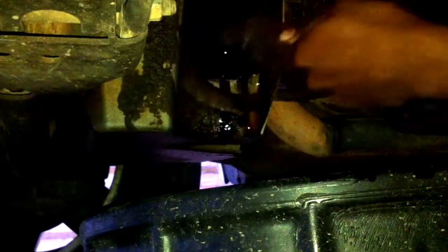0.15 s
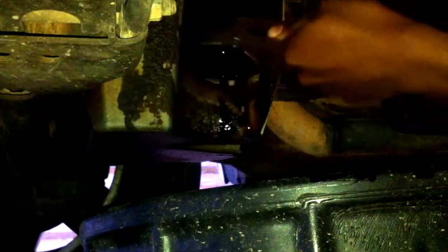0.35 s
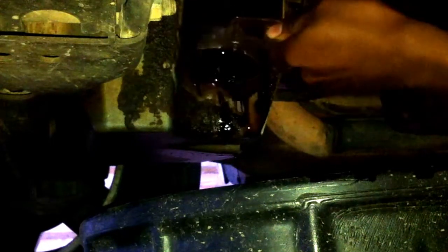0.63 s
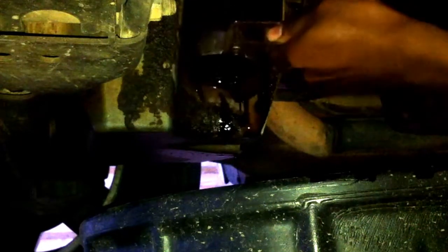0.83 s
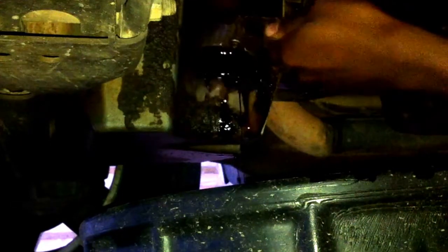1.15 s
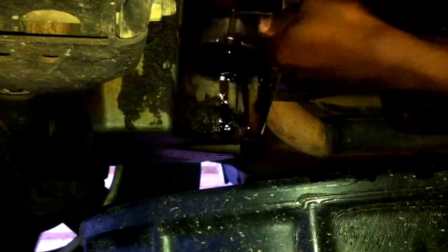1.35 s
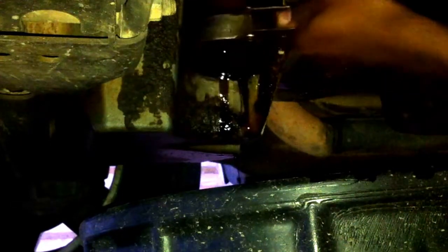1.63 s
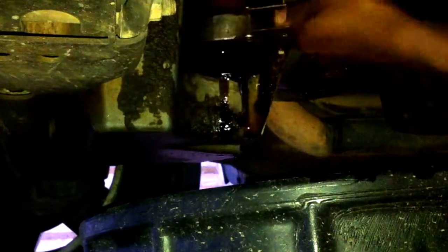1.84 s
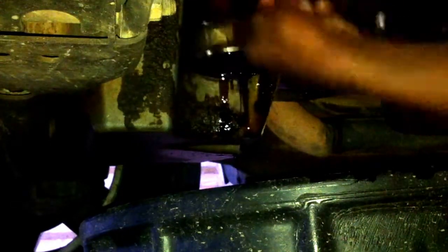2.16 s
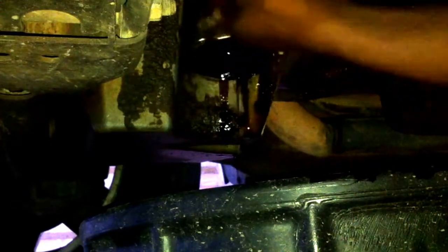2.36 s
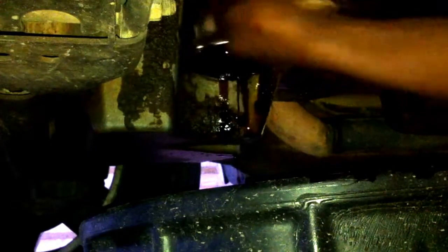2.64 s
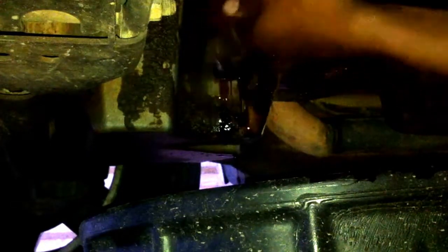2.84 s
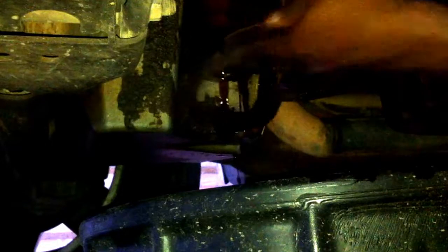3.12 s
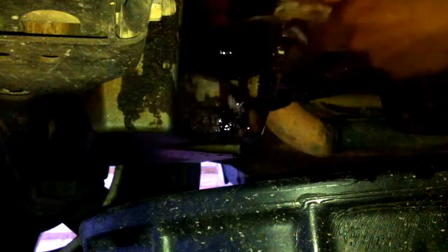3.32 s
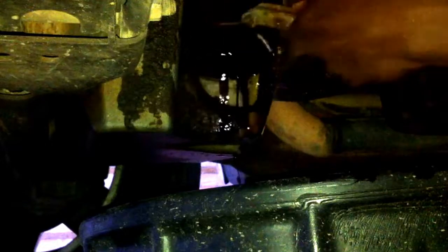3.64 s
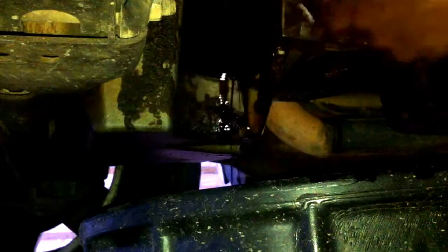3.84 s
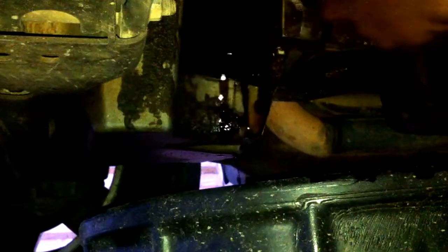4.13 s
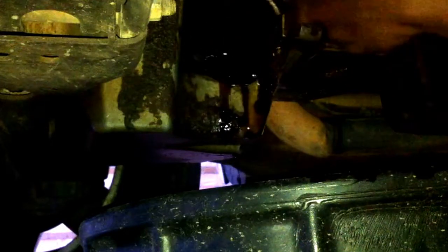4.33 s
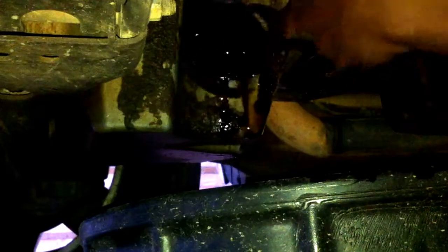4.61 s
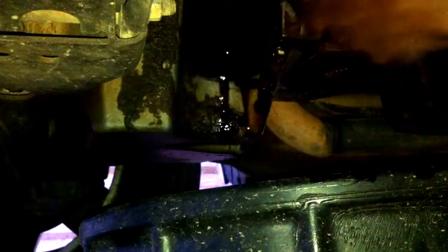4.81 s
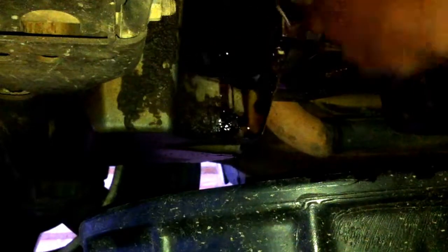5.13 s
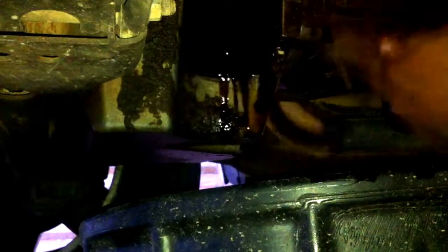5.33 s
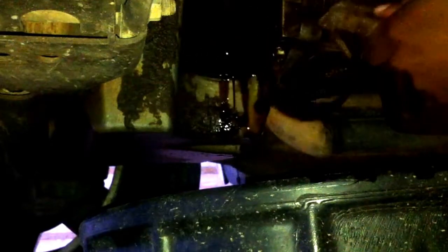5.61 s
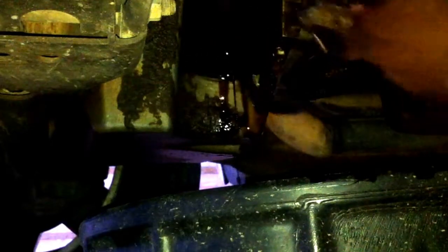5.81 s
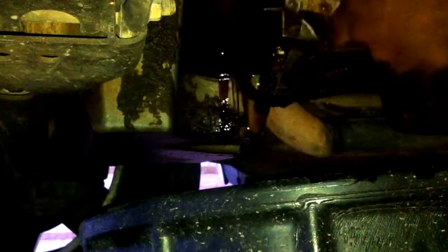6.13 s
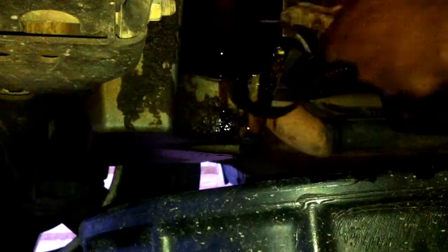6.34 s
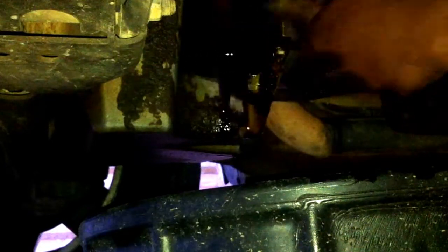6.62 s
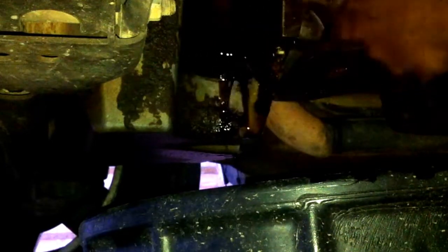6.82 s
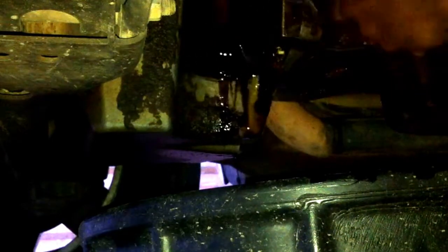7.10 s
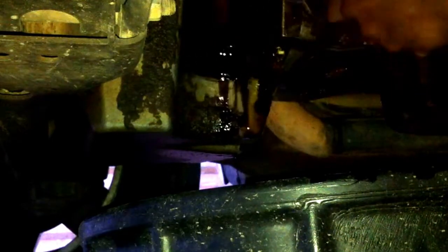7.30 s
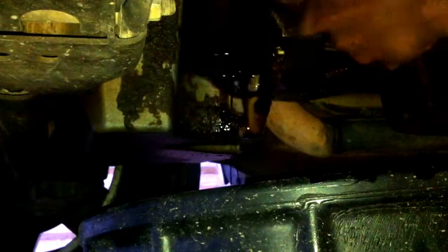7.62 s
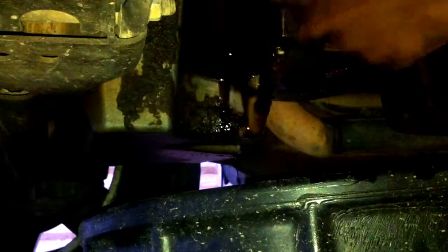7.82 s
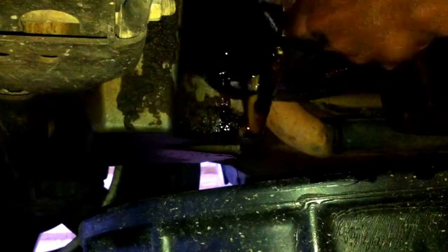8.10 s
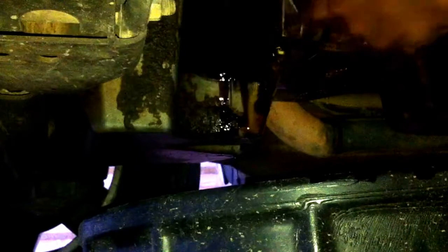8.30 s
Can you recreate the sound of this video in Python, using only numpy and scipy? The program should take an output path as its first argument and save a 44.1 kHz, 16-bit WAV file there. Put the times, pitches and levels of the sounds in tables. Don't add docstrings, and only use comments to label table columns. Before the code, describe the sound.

Thick oil drips and trickles into a plastic drain pan under a vehicle while a wrench taps hollow metal and cloth drags, bumping a panel midway.

```python
import sys
import numpy as np
from scipy import signal
from scipy.fft import rfft, irfft, next_fast_len
from scipy.io import wavfile
from scipy.ndimage import map_coordinates

SR = 44100
rng = np.random.default_rng(int(sys.argv[2]) if len(sys.argv) > 2 else 0)


def attenuation_scalar(level_db):
    decades = np.asarray(level_db, float) / 20
    return 10 ** decades


def generate_wav(signal):
    frames = np.transpose(np.atleast_2d(signal))
    scaled = np.clip(frames, -1, 1) * 32767
    pcm = np.round(scaled).astype(np.int16)
    wavfile.write(sys.argv[1], SR, pcm)


N = 373086

# t/s, peak level/dB, pan pitch f/Hz, length/s
EARLY_DRIPS = [(0.054, -45.5, 180, 0.022), (0.176, -48.8, 166, 0.026), (0.224, -48.2, 175, 0.018),
               (0.424, -51.6, 180, 0.032), (0.535, -51, 172, 0.025), (0.594, -45.9, 170, 0.042),
               (0.732, -49.4, 173, 0.037), (0.778, -41.0, 170.7, 0.035), (0.887, -48, 174, 0.026),
               (0.885, -51, 164.4, 0.064), (0.957, -51, 175, 0.023), (1.079, -46.5, 176, 0.018),
               (1.105, -49, 164, 0.016), (1.166, -52.5, 183, 0.027), (1.223, -52.7, 179, 0.024),
               (1.269, -51, 184, 0.03), (1.371, -48, 172.5, 0.031), (1.452, -49, 178, 0.015),
               (1.673, -40, 172, 0.017), (1.707, -47.5, 181, 0.019), (1.79, -45.6, 176, 0.025),
               (1.917, -52.5, 184, 0.04), (2.039, -47.5, 187, 0.039), (2.15, -43.5, 169, 0.017),
               (2.218, -45, 176.6, 0.023), (2.216, -53, 179.7, 0.048), (2.285, -44.5, 178, 0.024),
               (2.452, -42.5, 172, 0.036), (2.626, -47.5, 174, 0.017), (2.673, -49.8, 174, 0.014)]
MIDDLE_DRIPS = [(2.804, -50.9, 169, 0.022), (2.886, -50.5, 182, 0.043), (3.056, -45.5, 172, 0.018),
                (3.09, -51.5, 181, 0.036), (3.137, -49.5, 176.4, 0.07), (3.24, -45, 180, 0.036),
                (3.522, -50.5, 174, 0.033), (3.747, -41, 176, 0.021), (3.781, -51.5, 174, 0.02),
                (3.838, -49.5, 177, 0.032), (3.916, -58, 170, 0.02), (3.96, -54, 172, 0.021),
                (4.049, -46, 174, 0.03), (4.127, -55, 167, 0.057), (4.203, -50, 172, 0.014),
                (4.228, -48, 168.3, 0.035), (4.274, -53, 177, 0.045), (4.429, -51.5, 169, 0.087),
                (4.463, -50.5, 167, 0.017), (4.576, -44.5, 173.7, 0.034), (4.751, -50, 172, 0.017),
                (4.775, -51, 178, 0.017), (4.919, -50, 175, 0.026), (5.139, -48, 176, 0.032),
                (5.321, -47, 170, 0.011), (5.353, -52.5, 201, 0.0074)]
LATE_DRIPS = [(5.552, -43.5, 170, 0.022), (5.633, -49, 170, 0.024), (5.756, -50.1, 179, 0.02),
              (5.957, -55, 195, 0.047), (6.021, -45, 180, 0.014), (6.049, -51, 195, 0.017),
              (6.152, -45.5, 172, 0.029), (6.23, -44, 188, 0.02), (6.314, -50.5, 175, 0.034),
              (6.488, -52.4, 169, 0.03), (6.631, -50.9, 172, 0.029), (6.68, -46.5, 173.3, 0.035),
              (6.722, -45.5, 170, 0.023), (6.756, -45, 171, 0.032), (6.831, -52.2, 173, 0.028),
              (6.885, -48.5, 172, 0.023), (7.177, -52, 165.5, 0.034), (7.3, -48, 178, 0.019),
              (7.336, -50.5, 183, 0.017), (7.366, -47.1, 164.3, 0.036), (7.439, -51, 172, 0.025),
              (7.492, -42, 176, 0.014), (8.062, -50.5, 170, 0.026), (8.124, -47.5, 178.4, 0.031),
              (8.233, -47, 172, 0.018)]
FAINT_DRIPS = [
    (5.856, -59, 162, .025),
    (7.016, -60, 140, 0.022),
    (7.111, -59, 183, 0.027),
    (7.702, -55, 180, 0.053),
    (7.861, -60, 164, 0.022),
    (7.912, -56, 175, 0.02),
]
# t/s, flow level/dB
STREAM = [(0, -56.5), (0.8, -62.5), (3.1, -65), (5, -64), (5.25, -64), (5.49, -49.5), (5.77, -61),
          (6.08, -57), (6.95, -67), (7.45, -64.5), (7.84, -81), (8.46, -62.5)]
# f/Hz, width/Hz, level/dB
PAN_FLOOR = [(172, 42, 1.5), (313, 35, -9)]
PAN_WALLS = [(331.5, 55, 0.5), (521, 53, 5.5), (647, 89, -1), (723, 49, 2.5), (872, 39, 2.5),
             (1250, 230, -10), (1630, 530, -24.5)]
PATTER_DB, PATTER_FOLLOWS = -71, 0.47

# f/Hz, level/dB (per Hz)
GARAGE_HISS = [(12, -39), (20, -23), (49, -22), (59, -33.5), (119, -2.5), (171, 0.5), (239, -9), (384, -11),
               (887, -13), (1020, -16), (1550, -21.5), (6790, -26), (9490, -24.5), (14000, -29.5),
               (15900, -29)]
HISS_DB = -66.5
# f/Hz, level/dB
WHINE = [(14998, -80)]

# t/s, peak level/dB, blow f/Hz, softness/dB
TAPS = [(0.081, -35, 1200, -14), (1.034, -59, 1930, -5), (1.1827, -55, 1250, -10),
        (3.5043, -36.5, 1300, -12), (3.5468, -44, 870, -4), (4.0181, -31.5, 1250, -8.5),
        (4.2219, -52, 700, 1.5), (4.9955, -54, 1280, 7), (5.3524, -41.5, 900, 8), (5.463, -52, 1100, 7),
        (5.8, -49, 1130, -2), (5.924, -50, 1560, -18), (6.0212, -39, 1800, -10), (6.1835, -52, 1500, -19),
        (6.2088, -45.5, 1580, -11), (6.4627, -52.5, 1370, -7), (6.4946, -48.5, 1250, 7.5),
        (6.7, -56.5, 1510, -13), (6.65, -57.5, 1300, -7), (6.7574, -57, 620, 1), (6.9125, -40, 1900, -1.5),
        (6.9205, -44.5, 790, 0), (6.9265, -42, 1400, -9), (6.1595, -53, 1490, -18), (6.173, -57, 1400, -18),
        (7.509, -47, 1500, 3), (7.1666, -62, 1210, 12), (7.4475, -56.5, 600, -1), (7.24, -60, 650, 0),
        (7.3, -62, 890, 2), (3.795, -58.5, 1300, -6), (7.519, -46.5, 880, 2.5), (7.647, -45, 870, 4.5),
        (7.657, -52, 890, -4), (7.988, -55.5, 1000, 1), (8.1444, -49, 850, 0), (8.438, -50.5, 500, 0),
        (8.4295, -51, 990, -3)]
# f/Hz, width/Hz, level/dB
CHASSIS = [(486, 113, -3), (732, 58, -0.5), (890, 57, 1), (980, 220, 0), (1250, 250, 5.5), (1624, 270, 1),
           (2050, 240, -3.5), (2680, 590, 6), (3900, 680, 6.5), (4630, 1200, 2.5)]
# f/Hz, level/dB, time to fall 60 dB/s
HOLLOW_FRAME = [(500, -2, 0.13), (724, 0.5, 0.74), (700, -5, 0.39), (878, -1.5, .33), (907, -9, 0.64),
                (1055, -7, .35), (1300, -3, 0.28), (1427, -10.5, 0.45), (1560, -8, 0.23), (1680, -15, .18)]
TREBLE_DB, TREBLE_LOSS = -19, 0.59
BLOW_LOSS, RING_GAIN, ECHO_GAIN = 0.33, 0.24, 0.17
ECHO_T60_S = 0.14
HAND_DAMPS = 12

# peak t/s, rise/s, fall/s, level/dB, brightness/dB
GLOVE_RUBS = [(1.04, .03, .02, -60, -6), (1.182, .015, .12, -73, 1.5), (1.365, .015, 0.19, -68.5, 1.5),
              (1.434, 0.01, 0.083, -62, -2), (2.056, 0.036, .02, -61, -7), (2.16, 0.13, .09, -64.5, -1),
              (2.326, 0.062, .06, -71, 1.5), (2.418, .02, 0.071, -64.5, -1), (2.61, 0.14, 0.13, -70, -2),
              (2.91, 0.087, .09, -65.5, 3.5), (3.138, .02, .07, -82, 0), (1.25, .025, 0.065, -70, -1),
              (2.21, .04, 0.033, -70.5, 4), (2.45, 0.025, 0.036, -69, 1), (7.11, 0.054, .08, -73.5, 4.5)]
SLEEVE_STROKES = [(4.994, 0.031, .06, -62.5, -23), (5.075, .012, .08, -58, -19),
                  (5.14, 0.09, 0.13, -46, -19.5), (5.19, 0.071, 0.15, -48.5, -17),
                  (5.29, 0.18, 0.17, -51, -16.5), (5.335, 0.023, 0.068, -62, -3.5),
                  (5.36, .012, 0.11, -48.5, -13), (5.385, 0.045, .08, -54, -7),
                  (5.416, 0.014, 0.13, -45, -16), (5.63, 0.28, 0.15, -56.5, -10),
                  (5.77, 0.24, 0.2, -59, -11), (5.88, 0.11, .08, -63, -6.5),
                  (5.925, .006, 0.091, -53, -12.5), (5.99, 0.085, .08, -45, -12),
                  (6.022, .035, 0.055, -44.5, -7), (6.057, 0.019, 0.045, -43, -3.5),
                  (6.09, .05, 0.14, -54, -11), (6.41, .1, 0.11, -66.5, -7),
                  (6.214, 0.068, 0.13, -55.5, -9.5), (6.345, 0.064, 0.053, -57.5, -6.5),
                  (6.5, .2, 0.3, -69, -23)]
SWING_DB, ROUND = 25.5, 1.71
SCUFF_DB, FIZZ_DB, FIZZ_GROWS = (-5.5, 0.5), (-3, -1.7), 1.05
# f/Hz, level/dB (per Hz)
DRAG = [(150, -46), (250, -18), (413, -8), (500, -16), (568, -6), (1050, -6), (2070, -12.5), (3200, -36),
        (4160, -52), (7040, -120)]
# f/Hz, width/Hz, level/dB
FOLDS = [(432, 42, -7), (726, 11, -9), (910, 44, -2.5), (1280, 48, -0.5), (2060, 570, -13.5),
         (3140, 28, -30)]
# f/Hz, width/Hz, level/dB
SCUFF = [(2050, 310, -2.5), (2740, 650, 0.5), (3790, 370, 1.5), (4310, 490, -1.5), (5420, 910, -6)]
# f/Hz, width/Hz, level/dB
FIZZ = [(6540, 1600, -16.5), (7800, 900, -7), (8500, 210, -4), (9090, 330, -0.5), (9770, 430, 0),
        (10390, 340, -2.5), (11160, 960, -4), (13400, 2900, -12)]
# t/s, f/Hz, level/dB
SQUEAK = [
    (5.62, 3420, -82),
    (5.69, 3550, -68),
    (5.74, 3540, -69.5),
    (5.82, 3440, -70),
    (5.85, 3380, -82),
]

# t/s, peak level/dB, middle range level/dB, time to fall 60 dB/s
CRINKLES = [(1.183, -54, -11, 0.038), (1.2363, -61, -2, 0.1), (1.3635, -61.5, 3, .06),
            (1.4338, -42.5, -9.5, 0.053), (1.605, -43, -9, 0.095), (2.041, -54, -8, .04),
            (2.046, -48, -8, 0.025), (2.05, -53, -7, 0.022), (1.443, -54, -4, .06),
            (2.932, -52, -13, 0.048), (2.951, -50, -14, 0.025), (2.955, -57, -12, 0.027),
            (2.0941, -53, -9, 0.057), (2.285, -56, -5, 0.05), (2.3083, -55, -6, 0.07),
            (2.411, -60, -3, 0.05), (2.5765, -61, -3, 0.054), (2.6339, -60, -18, 0.05),
            (2.935, -46.5, -4, 0.055), (3.1412, -61.5, -1, 0.05), (3.7894, -60, 0, 0.05),
            (4.6994, -62, 0.5, 0.054), (5.3223, -53, -17, 0.05), (5.4132, -51, -9, 0.05),
            (5.462, -50, -1.5, 0.05), (5.6191, -49, -16, 0.05), (5.865, -47.5, -12, 0.004),
            (6.0122, -46, -13, 0.066), (6.0504, -34, -25, 0.029), (6.058, -39.5, -8, 0.055),
            (5.355, -49, -14, 0.077), (5.879, -56, -16, .02), (5.985, -48, -12, .05),
            (6.2233, -60, -18, 0.055), (6.3235, -55, -17, 0.05), (6.348, -55, -16, 0.073),
            (6.908, -56, -25, 0.06), (8.431, -57, 3.5, 0.092)]
# f/Hz, width/Hz, level/dB
SNAP = [(2300, 880, -6), (3700, 400, 3), (4530, 470, -0.5), (5340, 660, 0), (12500, 2600, -8)]

# t/s, level/dB, f/Hz, time to fall 60 dB/s
PLINKS = [
    (1.185, -65, 970, 0.046),
    (1.395, -68, 2050, 0.18),
    (1.478, -60, 758, 0.15),
    (2.042, -63, 1990, .04),
    (2.592, -63, 1280, 0.072),
    (5.625, -51, 770, 0.098),
    (5.925, -55, 1580, 0.25),
    (7.088, -70, 5500, .07),
]

# t/s, ring level/dB, scatter level/dB
CLANK = (1.606, -42.5, -43)
# f/Hz, level/dB, time to fall 60 dB/s
STEEL = [(808, -2, 0.37), (910, -9, .45), (1055, -5.5, 0.46), (1300, -14, .37), (1410, -14, .31),
         (1580, -13.5, .3), (1998, 0, 0.26), (2380, -6, .15), (2455, -7, 0.22), (2789, -8, .12),
         (2980, -6, .1), (3800, -16, 0.13), (4215, -6, .14), (4520, -10, 0.27), (5136, -9, .1),
         (5500, -9, .09), (6300, -14, 0.074)]

# t/s, peak level/dB, f/Hz
CATCHES = [(5.067, -51, 830), (5.073, -44.5, 860), (5.228, -49, 1010), (5.24, -48, 1500),
           (5.298, -45, 1300), (5.315, -50, 1100), (5.33, -46, 1400), (5.378, -36, 1300),
           (5.393, -41, 1500), (5.402, -46, 900), (5.088, -41, 1110), (5.103, -39, 920), (5.12, -36, 745),
           (5.135, -48, 1300), (5.143, -37, 890), (5.149, -39.5, 720), (5.168, -42, 1190),
           (5.179, -36, 930), (5.192, -44, 680), (5.213, -44, 1150), (5.264, -51, 900), (5.279, -55, 750),
           (5.352, -39, 915), (5.361, -37, 620), (5.372, -38, 760), (5.385, -35.5, 516), (5.971, -40, 640),
           (5.985, -38, 1220), (5.996, -39, 950), (6.012, -46, 1100), (6.024, -41, 756), (6.031, -46, 700),
           (6.057, -45, 670), (6.062, -48, 1190), (6.071, -48, 800)]
CATCH_T60_S, CATCH_WIDTH = 0.04, 0.32

# t/s, level/dB, hardness/dB
BUMPS = [
    (5.4135, -29.5, 13),
    (5.417, -18.5, 12.5),
    (5.4288, -21.5, -5.5),
    (5.4418, -32.5, -23),
    (5.4463, -30.5, -5),
    (5.4626, -35.5, 24),
    (5.4743, -34.5, 13),
]
# f/Hz, level/dB, time to fall 60 dB/s
PANEL = [(131, -3, 0.088), (207, -5, 0.038), (240, -14.5, 0.22), (269, 12, 0.0313), (298, 1.5, 0.016),
         (379, 0, 0.07), (504, -5.5, 0.03), (777, -11.5, 0.019)]
# t/s, width/s, level/dB, top f/Hz
JOLTS = [
    (5.45, .04, -49, 40),
    (6.025, 0.057, -51, 380),
]


def unit(x):
    return x / np.sqrt(np.mean(x ** 2) + 1e-20)


def seconds(length):
    return np.arange(int(length * SR)) / SR


def onset(t, rise):
    return 1 - np.exp(-t / rise)


def decay(t, t60):
    return attenuation_scalar(-60 * t / t60)


def curves(rows, outside=-120):
    s, *cols = np.transpose(rows)
    return np.array([np.interp(np.arange(N) / SR, s, c, outside, outside) for c in cols])


def wobble(rate):
    knots = rng.standard_normal(int(N * rate / SR) + 4)
    return map_coordinates(knots, [np.arange(N) * rate / SR])


def filtered(x, response):
    m = next_fast_len(len(x) + 8192)
    return irfft(rfft(x, m) * response(np.fft.rfftfreq(m, 1 / SR)), m)[:len(x)]


def colour(points):
    f, v = np.transpose(points)
    return lambda hz: attenuation_scalar(np.interp(np.log(hz + 1), np.log(f + 1), v, -120, -120))


def resonant(modes):
    def response(f):
        total = 0
        for k, (c, w, db) in enumerate(modes):
            total = total + (-1) ** k * attenuation_scalar(db) * 1j * f * w / (c * c - f * f + 1j * f * w)
        return total
    return response


def ringing(modes, t, scatter_db):
    total = 0
    for hz, db, t60 in modes:
        strength = attenuation_scalar(db + scatter_db * rng.standard_normal())
        total = total + strength * decay(t, t60) * np.sin(2 * np.pi * (hz * t + rng.random()))
    return total


def grainy(rate, depth_db):
    return unit(rng.standard_normal(N) * attenuation_scalar(depth_db * wobble(rate)))


def add(track, s, db, sound, noisy=False):
    if noisy:
        size = 2.5 * np.sqrt(np.mean(sound[:SR // 40] ** 2))
    else:
        size = np.max(np.abs(sound))
    part = track[round(s * SR):][:len(sound)]
    part += attenuation_scalar(db) * sound[:len(part)] / size


def oil():
    drum, splat, t = np.zeros(N), np.zeros(N), seconds(0.2)
    for s, db, hz, length in [*EARLY_DRIPS, *MIDDLE_DRIPS, *LATE_DRIPS, *FAINT_DRIPS]:
        smothered = attenuation_scalar(-6 * (t / (1.17 * length)) ** 3.9) + attenuation_scalar(-18) * decay(t, 0.3)
        swell = onset(t, 0.0021) ** 2 * smothered
        add(drum, max(s, 0), db - 5.5, swell * np.sin(2 * np.pi * hz * t))
        spray = rng.standard_normal(len(t)) * np.minimum(t / 0.0069, 1) * decay(t, 0.093)
        add(splat, s + 0.00299, db - 1.5, spray)
    flow_db, = curves(STREAM, outside=None)
    murmur = unit(filtered(grainy(rate=35, depth_db=1.0), resonant(PAN_FLOOR)))
    murmur = attenuation_scalar(flow_db - 4.5) * murmur
    patter_db = PATTER_DB + PATTER_FOLLOWS * (flow_db - flow_db.mean())
    patter = attenuation_scalar(patter_db) * unit(filtered(grainy(rate=40, depth_db=2.5), resonant(PAN_WALLS)))
    return drum + murmur + patter + 3 * filtered(splat, resonant(PAN_WALLS))


def garage():
    out = attenuation_scalar(HISS_DB + 1.5) * unit(filtered(rng.standard_normal(N), colour(GARAGE_HISS)))
    for hz, db in WHINE:
        size = np.sqrt(2) * attenuation_scalar(db - 2.5 + 1.5 * wobble(12))
        out += size * np.sin(2 * np.pi * np.cumsum(hz + 11 * wobble(30)) / SR)
    return out


def wrench():
    out, t = np.zeros(N), seconds(1 / 3)
    low, mid, high = resonant(CHASSIS[:3]), resonant(CHASSIS[3:7]), resonant(CHASSIS[7:])
    dull = lambda f: 1 / (1 - (f / 2400) ** 2 + 1j * f / 2600) ** 2
    dull_mid = lambda f: mid(f) * dull(f)
    soft_high = lambda f: high(f) / (1 - (f / 5200) ** 2 + 1j * f / 5000)
    for s, db, hz, soft_db in TAPS:
        blow = np.sin(2 * np.pi * hz * t) + 0.14 * rng.standard_normal(len(t))
        blow += attenuation_scalar(-13 - 0.5 * soft_db) * np.sin(2 * np.pi * 2030 * t)
        blow *= decay(t, 0.015) * onset(t, 0.00064)
        add(out, s - 0.0003, db - BLOW_LOSS * soft_db - 1.0, filtered(blow, dull))

        damping = attenuation_scalar(-HAND_DAMPS * max(soft_db + 11, 0) * t)
        frame = ringing(HOLLOW_FRAME, t, scatter_db=0.5) * damping * onset(t, 0.01)
        add(out, s, db + RING_GAIN * soft_db - 12.5, frame)

        high_db = TREBLE_DB - TREBLE_LOSS * soft_db
        # response, level in dB, relative life, build-up in s
        ranges = ((low, 0.73 * soft_db - 3.5, 1.1, 0.0031),
                  (dull_mid, ECHO_GAIN * soft_db - 9, 1.3, 0.003),
                  (soft_high, high_db - 5.5, 0.5, 0.0005))
        for body, rel_db, life, lag in ranges:
            echoes = rng.standard_normal(len(t)) * decay(t, life * ECHO_T60_S) * onset(t, lag)
            add(out, s - 0.0005, db + rel_db, filtered(echoes, body), noisy=True)
    return out


def pressure():
    power, t = np.zeros((3, N + SR)), np.arange(-SR // 2, SR // 2) / SR
    for rows, scuff_db, fizz_db in zip((GLOVE_RUBS, SLEEVE_STROKES), SCUFF_DB, FIZZ_DB):
        for s, rise, fall, db, bright_db in rows:
            shape_db = db - SWING_DB * np.where(t < 0, -t / rise, t / fall) ** ROUND
            range_db = np.array([[0], [scuff_db + bright_db], [fizz_db + FIZZ_GROWS * bright_db]])
            start = round(s * SR) - SR // 2
            power[:, start:start + len(t)] += attenuation_scalar(shape_db + range_db) ** 2
    return np.sqrt(power[:, :N])


def rubbing():
    drag, scuff, fizz = pressure()
    grit = attenuation_scalar(1.77 * wobble(90))

    def rough(response):
        friction = grainy(rate=300, depth_db=1.5)
        slips = (rng.random(N) < 1200 / SR) * rng.standard_normal(N) * 3
        return unit(grit * filtered(friction + slips, response))

    cloth = drag * (attenuation_scalar(-3.5) * rough(colour(DRAG)) + attenuation_scalar(-10.0) * rough(resonant(FOLDS)))
    hz, db = curves(SQUEAK)
    squeak = np.sin(2 * np.pi * np.cumsum(hz + 90 * wobble(150)) / SR)
    squeak *= attenuation_scalar(db + 3.5) * (0.3 + wobble(520))
    return cloth + scuff * rough(resonant(SCUFF)) + fizz * rough(resonant(FIZZ)) + squeak


def crinkles():
    out, t = np.zeros(N), seconds(0.1)
    for s, db, mid_db, t60 in CRINKLES:
        grit = attenuation_scalar(4.0 * rng.standard_normal(len(t) // 40 + 1)).repeat(40)[:len(t)]
        shape = np.minimum(t / 0.0026, 1) * (decay(t, t60) * grit + 0.7 * decay(t, 0.0038))
        for modes, rel_db in ((FIZZ, 0), (SNAP, mid_db + 2.5)):
            spray = filtered(shape * rng.standard_normal(len(t)), resonant(modes))
            add(out, s - 0.0005, db + rel_db, spray)
    return out


def plinks():
    out, t = np.zeros(N), seconds(1 / 6)
    for s, db, hz, t60 in PLINKS:
        bubble = np.sin(2 * np.pi * hz * (t + 0.36 * t * t))
        add(out, s, db, bubble * decay(t, t60) * onset(t, 0.0026))
    return out


def clank():
    out, t = np.zeros(N), seconds(0.5)
    s, ring_db, scatter_db = CLANK
    for lag, rel_db in ((0, -1.5), (0.009, -5.5)):
        shimmer = 1 + 0.37 * wobble(128)[:len(t)]
        ring = ringing(STEEL, t, scatter_db=0.0) * shimmer * onset(t, 0.0013)
        add(out, s + lag, ring_db + rel_db, ring)
    scatter = rng.standard_normal(len(t)) * decay(t, 0.16) * onset(t, 0.004)
    add(out, s, scatter_db, filtered(scatter, resonant(CHASSIS)))
    return out


def catches():
    out, t = np.zeros(N), seconds(0.05)
    muffled = lambda f: 1 / (1 - (f / 2300) ** 2 + 1j * f / 2200) ** 2
    for s, db, hz in CATCHES:
        burst = rng.standard_normal(len(t)) * decay(t, CATCH_T60_S) * onset(t, 0.0005)
        width = CATCH_WIDTH * hz
        fold = resonant([(hz, width, 0), (1.58 * hz, width, -9)])
        add(out, s, db - 1.5, filtered(filtered(burst, muffled), fold))
    return out


def bump():
    out, t = np.zeros(N), seconds(0.25)
    for s, db, hard_db in BUMPS:
        ring = 0
        for hz, level, t60 in PANEL:
            mode_db = level + hard_db * np.log2(hz / 240)
            ring = ring + attenuation_scalar(mode_db) * decay(t, t60) * np.sin(2 * np.pi * hz * t)
        add(out, s, db + 1.3, ring * onset(t, 0.00093))
    small = lambda f: f * f / (f * f - 128 ** 2 - 1j * 55 * f) * f ** 4 / (f ** 4 + 100 ** 4)
    return filtered(out, small)


def jolt():
    out, noise, t = np.zeros(N), rng.standard_normal(N), np.arange(N) / SR
    for s, width, db, top_hz in JOLTS:
        rumble = unit(filtered(noise, lambda f: (f > 20) / (1 + (f / top_hz) ** 2)))
        out += attenuation_scalar(db) * rumble * np.exp(-((t - s) / width) ** 2)
    return out


def scene():
    near = oil() + wrench() + rubbing() + crinkles() + plinks() + clank() + catches() + bump() + jolt()
    bass_cut = lambda f: (f * f / (f * f - 115 ** 2 - 1j * 130 * f)) ** 2 + attenuation_scalar(-34.5)
    return (filtered(near, bass_cut) + garage())[None]


def low_pass(x):
    return signal.sosfilt(signal.butter(12, 15830, fs=SR, output="sos"), x)


def record(dry):
    limited = filtered(dry[0], lambda f: f < 15830)[None]
    return low_pass(limited)


dry = scene()
out = record(dry)
generate_wav(out)
```